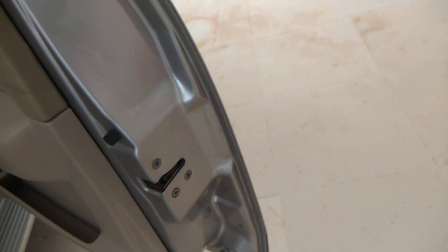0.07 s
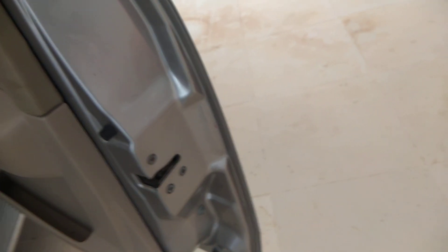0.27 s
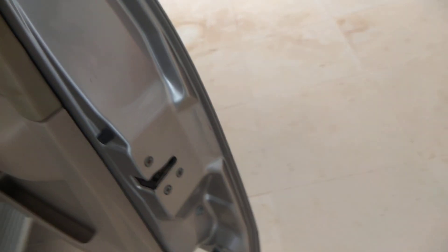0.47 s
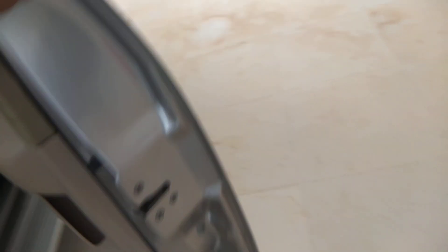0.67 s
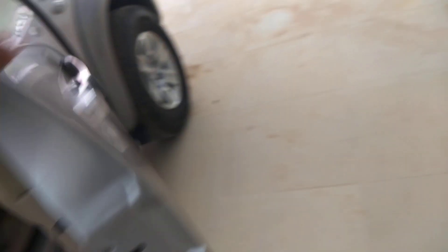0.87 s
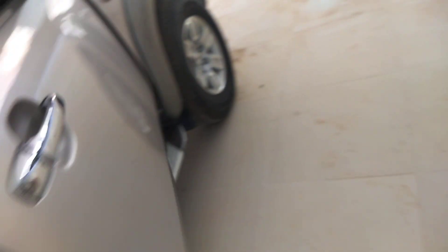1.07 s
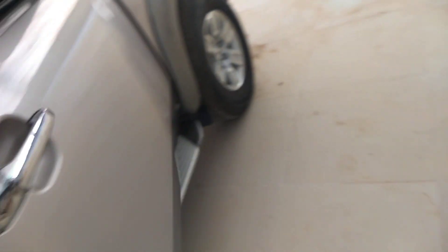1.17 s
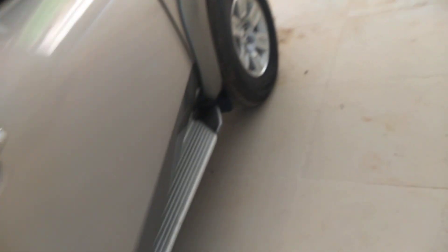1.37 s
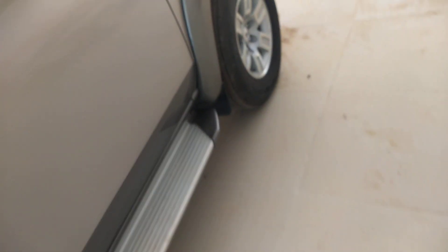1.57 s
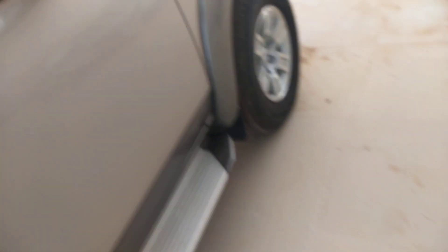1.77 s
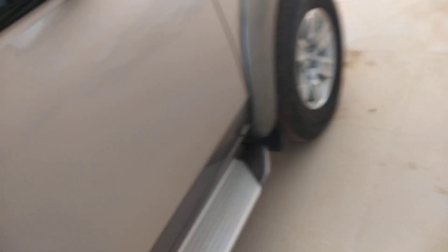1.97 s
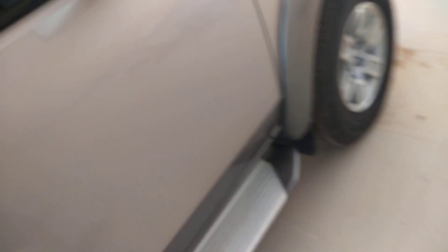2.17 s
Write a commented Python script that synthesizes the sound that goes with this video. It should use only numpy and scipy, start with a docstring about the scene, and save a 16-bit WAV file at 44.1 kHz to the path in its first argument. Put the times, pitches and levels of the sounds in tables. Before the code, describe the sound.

A heavy car door slams shut with one solid thud and a latch clack.

```python
"""First come soft hoots over a fading wash of noise, a faint hum and light rustles; then a heavy car door
is swung shut at arm's length, on a paved forecourt between walls. The latch touches the striker and snaps
over it; the door lands and shudders. Each impact excites damped normal modes: the cabin booms and the
panels ring, while the lock rattles. The walls return a few discrete echoes and a dull reverberant tail."""
import sys
import numpy as np
from scipy import signal
from scipy.fft import rfft, irfft, next_fast_len
from scipy.io import wavfile

SR = 44100
rng = np.random.default_rng(int(sys.argv[2]) if len(sys.argv) > 2 else 0)


def wrap_up_sound(samples):
    """Save the sound to the file named by the first command line argument, as 16-bit audio."""
    columns = np.atleast_2d(samples).T
    # keep every value between -1 and 1, then stretch to whole-number steps
    tamed = np.clip(columns, -1, 1)
    steps = np.round(tamed * 32767).astype(np.int16)
    wavfile.write(sys.argv[1], SR, steps)


N = 97681
T = np.arange(N) / SR
FFT_SIZE = 2 * next_fast_len(3 * N // 4, real=True)
FREQS = np.maximum(np.arange(FFT_SIZE // 2 + 1) * SR / FFT_SIZE, 1)
PUSH_S, SNAP_S = 0.0013, 0.00094  # rise times of panel and latch impacts


# impacts of the door: t/s, boom/dB, panel/dB, panel tilt/(dB per octave), metal crack/dB
BLOWS = [(1.6707, -25, -14, 1.5, -5.5), (1.683, -40, -22.5, -5, -15.5), (1.6932, -26, -32.5, 6.5, -18),
         (1.7051, -8, -13, -5, -13), (1.7159, -26.5, -25, 1, -16.5), (1.727, -36, -17.5, -4, -34),
         (1.7504, -47, -25, -3.5, -23), (1.7574, -22, -25.5, 2, -28), (1.7830, -34, -33.5, -3.5, -28)]
# modes of the cabin air with the door leaf, and of skin and frame: f/Hz, level/dB, T60/s
CABIN_MODES = [(96.8, -1, .21)]
PANEL_MODES = [(142, -7, .15), (158, -7, .24), (191, -5, .2), (233, -7, .2), (270, -7, .2), (305, -9, .15),
               (333, -3, .18), (373, -8, .22), (409, -8, .22), (430, -7, .17), (466, -7, .16),
               (513, -8, .13), (628, -11, .12), (665, -14, .12), (719, -15, .11), (805, -16, .09),
               (890, -19, .08)]
# spectra of the metal's crack and the panel's thud: f/Hz, level/dB
CRACK = [(200, 20), (500, 13), (1000, 6.5), (1700, 3.5), (2800, -5), (4500, -7), (6300, -9.5), (8500, -62),
         (14000, -18)]
THUD = [(25, -30), (50, -22), (80, -12), (150, 0), (450, -1), (750, -11), (1500, -28), (4000, -50)]

def door_blows():
    """Impact excitation: each blow sets cabin and panels in free vibration, with bursts of noise."""
    crack, thud = noise(CRACK, door_coherence()), noise(THUD, door_coherence())
    squeeze_s, lock_lag_s = .0103, .00068  # air is squeezed before the leaf lands; the lock snaps after
    out = np.zeros((2, N))
    for t, boom_db, panel_db, tilt_db, crack_db in BLOWS:
        tilted_modes = [(hz, db + tilt_db * np.log2(hz / 300), t60) for hz, db, t60 in PANEL_MODES]
        panel = ring(tilted_modes, t, PUSH_S) + undb(-3.5) * thud * strike(t, PUSH_S, t60=.055)
        out += undb(boom_db) * ring(CABIN_MODES, t - squeeze_s, squeeze_s)
        out += undb(panel_db) * panel
        out += undb(crack_db) * crack * strike(t + lock_lag_s, SNAP_S, t60=.045)
    return out


# modes of latch and seal at first contact: f/Hz, level/dB, T60/s
TOUCH_MODES = [(447, 0, .075), (385, -14, .05), (899, -9, .08), (1400, -23, .04)]

def latch_touch(start=1.6506):
    """Soft contact: latch and seal excite a few damped modes and a scuff of noise."""
    scuff = noise([(100, -31), (500, 1.5), (1500, 5), (3000, -26), (8000, -44.5)], door_coherence())
    knock = ring(TOUCH_MODES, start, attack=.0034)
    return undb(-12) * knock + undb(-29) * scuff * strike(start, PUSH_S, t60=.07)


# impacts of the latch: t/s, snap/dB, lock ring/dB
CLACKS = [(1.6716, -7.5, -16.5), (1.6777, -21, -40), (1.6838, -15, -34), (1.6950, -23, -38),
          (1.7060, -23, -29)]
# modes of the latch on the striker, and of the lock parts: f/Hz, level/dB, T60/s
SNAP_MODES = [(950, -3, .018), (1300, -5, .01), (1750, -3, .012), (2450, -4, .01), (2950, -4, .009)]
LOCK_MODES = [(878, 3, .07), (1575, -3, .09), (1750, -11, .06), (2170, -13, .08), (2390, -19, .06),
              (2593, -7, .07), (2744, -5.5, .075), (2834, -4.5, .075), (2914, -13, .05), (3225, -19, .12),
              (3580, -18, .12), (4414, -20, .13)]

def latch_clacks():
    """Modal damping: the latch's snap dies quickly, while the less damped lock rings on."""
    return sum(undb(snap_db) * ring(SNAP_MODES, t, SNAP_S) + undb(lock_db) * ring(LOCK_MODES, t, SNAP_S)
               for t, snap_db, lock_db in CLACKS)


# spectrum of the loose lock parts: f/Hz, level/dB
RATTLE = [(700, 11), (2000, 4), (4000, 9), (6200, 0), (8000, -13), (10000, -13.5), (12000, -10.5),
          (15000, -4)]

def lock_rattle(ticks_per_s=1100):
    """Shot noise: loose parts collide at random instants while the door lands."""
    ticks = (rng.random(N) < ticks_per_s / SR) * rng.standard_normal((2, N))
    rattle = unit(shape(ticks, undb(read(RATTLE, FREQS))))
    return undb(-28.5) * rattle * strike(1.661, attack=.0083, t60=.067, hold=.045)


# the door at the two microphone ports: f/Hz, left minus right level/dB, coherence (0-1)
PORTS = [(100, 2, 0.74), (410, -2, 1), (700, 0.5, 0.77), (1210, 5, 0.33), (2520, 1, 0), (4900, 1.5, 0.4),
         (8000, 12, 0.1), (14000, 7.5, .1)]

def direct_sound(x):
    """Level difference: the left port receives more of the door's treble."""
    half_db = read(PORTS, FREQS) / 2
    return shape(x, undb([half_db, -half_db]))


def door_coherence():
    """Coherence: the door's noise is alike at both ports in the bass, much less so in the treble."""
    return read(PORTS, FREQS, column=2)


# reverberation bands of the walls: f/Hz, level/dB, T60/s
WALLS = [(40, -1.5, 0.9), (92.5, -17, 0.5), (162, -6, 0.63), (282, -14, 0.6), (423, -10.5, 0.99),
         (740, -14, 0.97), (1490, -19, 0.6), (3740, -11.5, 1), (5400, -13, 1), (8950, -8, 0.92),
         (14000, -13.5, 1)]

def reverberation(x):
    """Convolution with dense wall reflections, each band decaying exponentially at its own rate."""
    scatter = noise([(20, 0), (20000, 0)], diffuse_coherence())
    log_centres, response = np.log([row[0] for row in WALLS]), 0
    for share, (_, db, t60) in zip(np.eye(len(WALLS)), WALLS):
        band = shape(scatter, np.interp(np.log(FREQS), log_centres, share))
        envelope = strike(.011, attack=.034, t60=t60)
        response += undb(db) * band * envelope / np.sqrt(np.sum(envelope ** 2))
    return signal.fftconvolve(x, response, axes=1)[:, :N]


# reflections from farther walls: delay t/s, level/dB, band centre f/Hz
ECHOES = [(.098, -13, 440), (.12, -12, 160), (.203, -19, 88), (.22, -16, 1000), (.275, -21, 340),
          (.303, -29, 100), (.385, -29, 265), (.436, -31, 400)]

def echoes(x, q=1.9):
    """Discrete reflection: each far wall returns a delayed, band-passed copy of the slam."""
    response = 0
    for delay, db, hz in ECHOES:
        band = 1 / (1 + 1j * q * (FREQS / hz - hz / FREQS))
        response += undb(db) * band ** 2 * np.exp(-2j * np.pi * FREQS * delay)
    return shape(x, response)


# spectrum of the surrounding wash: f/Hz, level/dB
WASH = [(18, -21), (30, -44), (156, -13.5), (249, -8.5), (284, -3.5), (324, -14), (467, -8.5), (575, -4.5),
        (767, -9), (852, -7.5), (2020, -13.5), (7860, -40.5), (15500, -97)]

def wash(fade_db_per_s=15):
    """Diffuse noise that flickers, fades and swells again under the slam."""
    fading = undb(-43 - fade_db_per_s * T)
    returning = undb(-52.5) * np.clip((T - 1.58) / .15, 0, 1)
    return flicker(noise(WASH, diffuse_coherence())) * (fading + returning) * undb(.5 * walk(35))


# spectra of the ambient air and the hiss: f/Hz, level/dB
AIR = [(18, -31), (30, -15), (152, -2.5), (243, -11.5), (284, 3.5), (332, -14), (575, -5.5), (622, -11),
       (673, -14), (897, -12), (1640, -16.5), (2990, -18.5), (15500, -49.5)]
HISS = [(6000, -49), (10000, -17.5), (13000, -12), (15500, -10.5)]

def air():
    """Noise floor: a stationary diffuse field and an incoherent hiss of wavering level."""
    return noise(AIR, diffuse_coherence()) * undb(-57) + noise(HISS, 0) * undb(-70.5 + 2.3 * walk(27))


# partials of the hum: f/Hz, level/dB
HUM_PARTIALS = [(108, -64), (167, -61), (574, -60), (840, -65.5), (1165, -69), (1735, -64), (1990, -67)]
# envelope of its main tone: t/s, level/dB
HUM_SWELLS = [(.18, -63), (.31, -56), (.5, -63), (.72, -57), (.98, -60), (1.25, -69), (1.36, -60),
              (1.52, -59), (1.62, -67)]

def machine_hum(main_hz=281, waver_hz=4.24, fade_db_per_s=14):
    """Amplitude and frequency modulation: wavering partials fade; the main tone swells and sinks."""
    partials = 0
    for hz, db in HUM_PARTIALS:
        level_db = db + 1.1 * walk(9.8) - fade_db_per_s * (T - .5)
        partials += undb(level_db) * tone(hz + waver_hz * walk(39))
    main_db = np.interp(T, *np.transpose(HUM_SWELLS))
    return partials + undb(main_db) * tone(main_hz + waver_hz * walk(37))


# soft hoots and whistles: t/s, duration/s, f/Hz, level/dB
HOOTS = [(0.023, 0.074, 296, -33.5), (0.032, 0.026, 563, -33.5), (0.118, 0.0373, 667, -41.5),
         (0.237, 0.037, 571, -39), (0.405, 0.027, 2594, -55.5), (.001, 0.018, 2164, -49),
         (.066, .03, 2430, -52), (0.085, 0.028, 867, -42), (0.103, 0.033, 1944, -46.5),
         (0.155, .038, 710, -44), (0.184, .034, 880, -42.5), (0.286, 0.055, 833, -46.5),
         (0.319, .034, 1730, -48.5), (0.475, 0.039, 589, -48.5)]

def hoot(start, length, hz, db):
    """Frequency glide: a brief tone rises a little and wavers."""
    rise = .8 * np.clip(T - start - length / 2, -length, length)
    return undb(db) * swell(start, length) * tone(hz * (1 + rise + .0121 * walk(86)))


# handling bumps: t/s, level/dB
BUMPS = [(0.086, -43), (.297, -44), (0.787, -41)]

def bumps(hz=83.5, t60=.066):
    """Damped oscillation: each soft handling bump excites one low mode."""
    return sum(ring([(hz, db, t60)], t, attack=.004) for t, db in BUMPS)


# rustles of clothing and grip: t/s, duration/s, level/dB
RUSTLES = [(.47, 0.094, -68), (0.855, 0.11, -59.5), (1.41, 0.3, -67), (1.843, 0.059, -49),
           (1.9, 0.35, -58.5), (2.174, 0.047, -50.5)]
# their spectrum: f/Hz, level/dB
RUSTLE_SPECTRUM = [(500, -41), (2000, -10), (4200, 0.5), (7000, -12.5), (9000, -27), (11500, -9),
                   (14500, -3.5)]

def rustles():
    """Friction noise: clothing and grip give light, incoherent swells."""
    return noise(RUSTLE_SPECTRUM, 0) * sum(undb(db) * swell(t, length) for t, length, db in RUSTLES)


def squeak(start=1.375, length=.055, rise_hz_per_s=55000):
    """Linear chirp: one thin, unsteady tone rises as the door swings."""
    hz = 5700 + rise_hz_per_s * np.clip(T - start, 0, length) + 300 * walk(900)
    return undb(-73) * swell(start, length) * tone(hz)


def undb(db):
    """Amplitude ratio of a level in decibels."""
    return 10 ** (np.asarray(db) / 20)


def unit(x):
    """Normalisation to rms 1."""
    return x / np.sqrt(np.mean(x ** 2))


def read(table, hz, column=1):
    """Interpolation of a table column along log frequency."""
    rows = np.array(table, float)
    return np.interp(np.log(hz), np.log(rows[:, 0]), rows[:, column])


def shape(x, gain):
    """Linear filtering by a gain at each frequency."""
    return irfft(rfft(x, FFT_SIZE) * gain)[..., :N]


def noise(spectrum, coherence):
    """Mid-side synthesis: stereo noise of rms 1 with a given spectrum (f/Hz, level/dB) and coherence."""
    mid, side = rng.standard_normal((2, N))
    gain = undb(read(spectrum, FREQS))
    mid = shape(mid, gain * np.sqrt(1 + coherence))
    side = shape(side, gain * np.sqrt(1 - coherence))
    return unit(np.array([mid + side, mid - side]))


def diffuse_coherence(corner_hz=650):
    """Coherence of a diffuse field: one in the bass, none in the treble."""
    return 1 / (1 + (FREQS / corner_hz) ** 3)


def strike(start, attack, t60, hold=0):
    """Transient envelope: linear rise, hold, exponential decay."""
    decay_s = np.maximum(T - start - attack - hold, 0)
    return np.clip((T - start) / attack, 0, 1) * undb(-60 * decay_s / t60)


def swell(start, length):
    """Hann envelope: a smooth rise and fall."""
    return np.sin(np.pi * np.clip((T - start) / length, 0, 1)) ** 2


def ring(modes, start, attack):
    """Modal superposition: damped sinusoids excited together."""
    age = np.maximum(T - start, 0)
    vibration = sum(undb(db - 60 * age / t60) * np.cos(2 * np.pi * hz * (age - attack / 2))
                    for hz, db, t60 in modes)
    return np.minimum(age / attack, 1) * vibration


def tone(hz):
    """A sinusoid whose phase is the integral of its frequency."""
    return np.sin(2 * np.pi * np.cumsum(hz) / SR)


def walk(rate_hz):
    """Random fluctuation: low-passed Gaussian noise of rms 1."""
    return unit(shape(rng.standard_normal(N), np.exp(-(2 * FREQS / rate_hz) ** 2)))


def flicker(x, bands=36, depth_db=2.2, steps_per_s=22):
    """Random amplitude modulation: narrow bands swell and sink independently."""
    band_index = np.interp(np.log(FREQS), np.log([250, 5000]), [0, bands - 1])
    steps, out = int(N / SR * steps_per_s) + 2, 0
    for k in range(bands):
        level_db = depth_db * np.interp(T * steps_per_s, np.arange(steps), rng.standard_normal(steps))
        out += shape(x, np.maximum(1 - abs(band_index - k), 0)) * undb(level_db)
    return unit(out)


def scene():
    """Superposition of door, reflections and surroundings; the left channel lags slightly."""
    door = door_blows() + latch_touch() + latch_clacks() + lock_rattle()
    radiation = signal.butter(3, 62, "high", fs=SR, output="sos")  # the door radiates little deep bass
    slam = signal.sosfilt(radiation, door)
    slam_and_walls = direct_sound(slam) + reverberation(slam) + echoes(slam)
    background = wash() + air() + machine_hum() + sum(hoot(*row) for row in HOOTS)
    left, right = slam_and_walls + background + bumps() + rustles() + squeak()
    lag_s = .00039 / (1 + (270 / FREQS) ** 2)  # the microphone system's lag, smaller in the bass
    return np.array([shape(left, np.exp(-2j * np.pi * FREQS * lag_s)), right])


def record(dry):
    """Soft saturation rounds the highest peaks; a low-pass filter cuts the top."""
    return signal.sosfilt(signal.ellip(10, .1, 80, 15700, fs=SR, output="sos"), np.tanh(dry))


dry = scene()
out = record(dry)
wrap_up_sound(out)
```